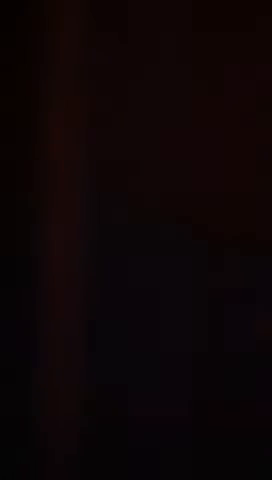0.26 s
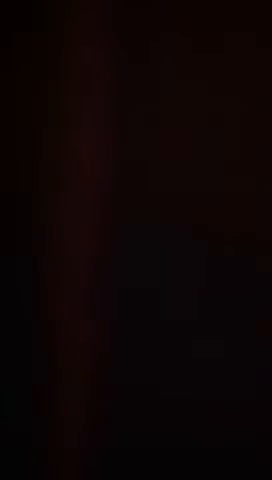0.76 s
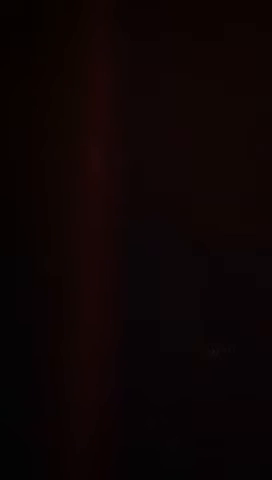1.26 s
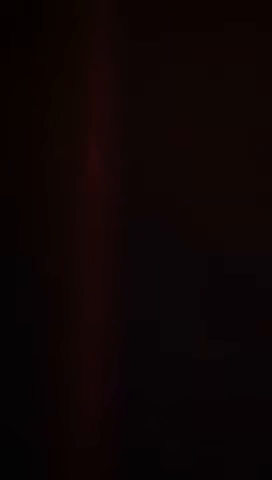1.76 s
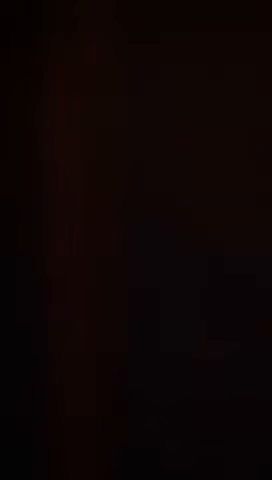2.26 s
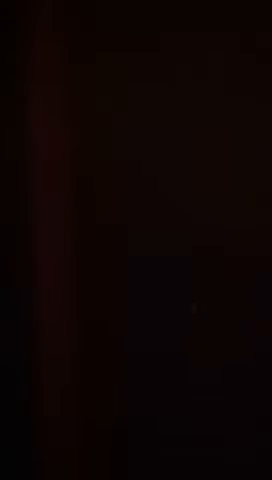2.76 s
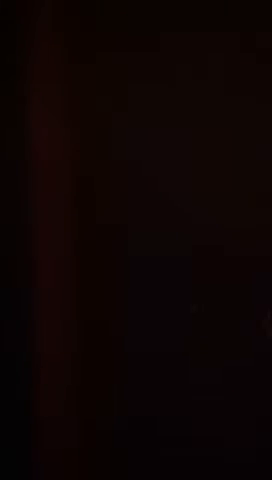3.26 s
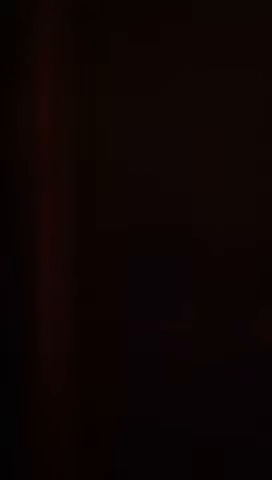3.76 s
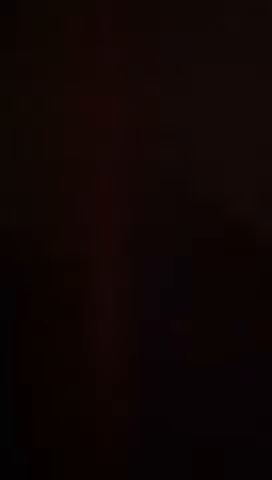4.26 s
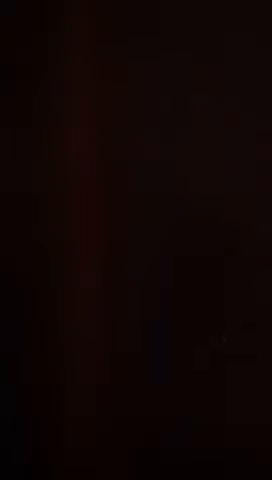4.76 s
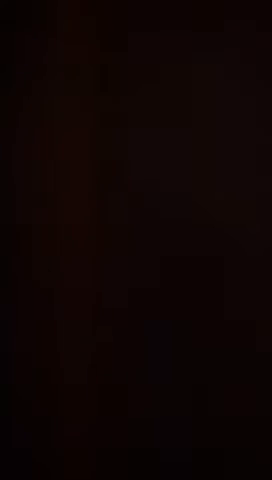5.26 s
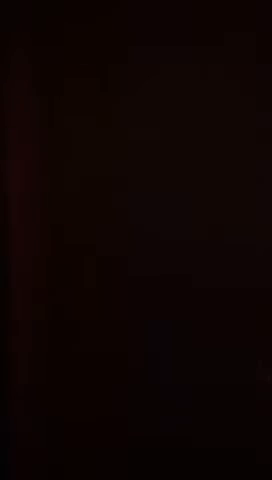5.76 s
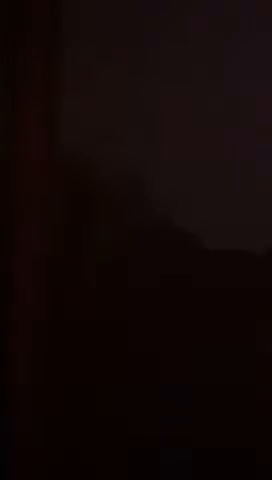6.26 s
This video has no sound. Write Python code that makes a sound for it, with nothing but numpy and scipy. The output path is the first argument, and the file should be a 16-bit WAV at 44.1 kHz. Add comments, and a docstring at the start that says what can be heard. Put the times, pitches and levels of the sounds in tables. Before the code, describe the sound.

Night rain drips and gurgles near a sheltered spot; after about four seconds a drop raps sharply and low thunder grumbles in uneven waves.

```python
"""Steady rain heard from a sheltered spot: short ticks, smacks and plops close by over a far wash.
Run-off gurgles in gushes, one drop raps a hard object, and distant thunder rolls in, in several waves.
Ticks and the rap excite damped resonances, smacks are filtered noise bursts, puddle drips gliding sines.
Run-off is many small ringing bubbles; thunder is random shock fronts coloured by frequency bands
under swelling gains, with single strong pulses and sharp snaps; the far rain is coloured noise."""
import sys
import numpy as np
from scipy import signal
from scipy.io import wavfile

SR = 44100
rng = np.random.default_rng(int(sys.argv[2]) if len(sys.argv) > 2 else 0)


def generate_wav(sig):
    """Save sig (samples, or channels by samples) to the path in sys.argv[1] as 16-bit PCM at SR."""
    pcm = np.round(np.clip(np.atleast_2d(sig).T, -1, 1) * 32767).astype(np.int16)
    wavfile.write(sys.argv[1], SR, pcm)


N = 287530   # length in samples

SPLATTER_T60_S = 0.014
TAP_DB = 15   # the first contact stands above the splatter


def tick(level_db, pitch_hz, splash_db, t60_s):
    """Resonance: a decaying burst of splatter drives a damped mode, beside a wide-band splash."""
    t = np.arange(4000) / SR
    splatter, spray = rng.standard_normal((2, 4000))
    blow = splatter * from_db(-60 * t / SPLATTER_T60_S) + from_db(TAP_DB) * (t == 0)
    body = ring(ring(blow, pitch_hz, t60_s), pitch_hz, t60_s)   # two in series: a soft, wet contact
    body = body / np.abs(body).max()
    splash = rms_one(bandpass(spray, 2500, 9500, order=3)) * from_db(splash_db - 60 * t / 0.027)
    return from_db(level_db) * (body + splash)


# short ticks: near drops on hard ground and leaves, and sharp snaps within the thunder's crackle:
# start_s [s], level_db [dB, peak of the body], pitch_hz [Hz], splash_db [dB, against the peak of the body]
TICKS = [(0.0396, -50, 1940, -18), (0.3097, -46.5, 3100, -23), (0.41, -48.5, 5600, -10),
         (0.612, -43.5, 2300, -8), (0.71, -42.5, 2480, -25), (0.7517, -47, 2160, -18),
         (0.7822, -45, 3660, -7), (0.8237, -48, 2290, -14), (0.856, -50.5, 7160, -16),
         (1.0131, -49, 2270, -12), (1.04, -46.5, 2850, -16), (1.0722, -45, 2570, -12),
         (1.1205, -50.5, 4330, -4), (1.134, -48.5, 1950, -14), (1.2815, -50, 2600, -21),
         (1.3382, -44.5, 2160, -22), (1.422, -50, 2950, -14), (1.4676, -51, 2020, -12),
         (1.513, -49, 2920, -20), (1.5682, -48, 2400, -14), (1.6242, -52, 2180, -14),
         (1.7464, -51, 2860, -20), (1.8432, -45.5, 6100, -15), (1.9465, -49.5, 2240, -8),
         (1.959, -52, 6100, -12), (2.114, -43.5, 4080, -20), (2.147, -53, 3600, -12),
         (2.5101, -45, 1870, -19), (2.543, -48, 2050, -14), (2.823, -48.5, 3770, -5),
         (2.864, -46.5, 2590, -9), (2.894, -53, 4220, 3), (3.0043, -44.5, 1820, -14),
         (3.049, -48.5, 2370, -4), (3.2774, -49, 2390, -16), (3.3318, -52, 2510, -16),
         (3.3593, -44.5, 2200, -22), (3.4004, -47, 2200, -21), (3.678, -48, 5300, -9),
         (3.7135, -48, 4670, -16), (3.7349, -49, 4000, -16), (3.764, -45, 3740, -6),
         (4.0195, -48, 2470, -7), (4.0634, -45.5, 3720, -6), (4.0856, -48, 4860, 0.5),
         (4.1175, -46.5, 2700, -18), (4.1325, -39.5, 1930, -19), (4.2896, -47, 2260, -19),
         (4.349, -40, 1510, -16), (4.391, -51.5, 6500, -18), (4.44, -50.5, 8240, -15),
         (4.535, -52, 6800, 0), (4.6144, -48, 2290, -22), (4.673, -47, 5380, -17), (4.738, -47, 2200, -20),
         (4.8037, -48, 1780, -6), (4.9472, -47, 2400, -10), (4.8703, -45, 5600, -18),
         (5.178, -43, 1880, -20), (5.4796, -49, 3320, -10), (5.6136, -50, 2930, -21),
         (5.7294, -50, 2900, -12), (5.937, -47, 2330, -22), (5.9848, -50, 1940, -13),
         (6.1858, -52, 4370, -14), (6.1948, -47, 3080, -17), (6.3255, -48, 1810, -20),
         (6.4018, -49, 2010, -9), (6.4657, -50, 2070, -11), (0.275, -51, 3100, -20),
         (0.594, -56, 10300, -20), (0.605, -52, 5000, -20), (0.615, -51, 3800, -20),
         (0.907, -55, 4480, -12), (1.141, -59, 11700, -20), (1.765, -52, 5700, -20), (1.8, -49, 3120, -20),
         (1.92, -52, 6200, -20), (1.939, -52, 8900, -20), (2.028, -49, 3960, -20), (2.114, -52, 5500, -20),
         (2.129, -55, 8960, -20), (2.243, -53, 4650, -20), (2.336, -49.5, 8600, -20),
         (2.484, -52, 7000, -20), (2.823, -49, 9200, -20), (2.857, -55, 8800, -20),
         (3.008, -45.5, 6330, -20), (3.043, -51, 2930, -20), (3.24, -51, 5800, -20),
         (3.332, -49, 4650, -20), (3.445, -52, 3100, -20), (3.764, -52, 8800, -20), (3.957, -51, 8640, -15),
         (4.305, -46, 2410, -20), (4.313, -48, 4300, -20), (4.559, -45.5, 3600, -20),
         (4.701, -52, 4820, -20), (4.884, -49, 3790, -20), (4.965, -51, 6720, -15), (4.99, -46.5, 4650, -5),
         (5.165, -53, 7920, -20), (5.17, -43.5, 4000, -20), (5.198, -54, 10300, -15),
         (5.317, -55, 6890, -20), (5.325, -50, 2760, -15), (5.447, -50, 7260, -17), (5.508, -52, 8650, -20),
         (5.713, -54.5, 7000, -20), (5.847, -58, 7200, -7), (5.911, -56, 8800, -20), (5.95, -57, 4650, -12),
         (5.987, -52.5, 4820, -6), (6.332, -49, 5130, -13), (6.465, -54, 8100, -20)]
TICK_T60_S = 0.0036


def ticks():
    """Impact excitation: each short tick, a near drop or a snap of the thunder, sounds its own pitch."""
    out = np.zeros(N)
    for start_s, level_db, pitch_hz, splash_db in TICKS:
        add(out, start_s, tick(level_db, pitch_hz, splash_db, TICK_T60_S))
    return out


# drops on one small hard surface: start_s [s], level_db [dB, peak of the body]
PINGS = [(0.0108, -46), (0.697, -44), (0.8619, -57), (0.9068, -51), (1.7656, -42), (1.8657, -43.5),
         (2.08, -46), (2.7834, -49), (3.4445, -53), (3.8072, -42.5), (4.6997, -48), (4.8698, -50),
         (5.1417, -46.5), (5.6972, -45), (5.7513, -49.5), (6.0786, -60), (6.1664, -54), (6.2387, -54),
         (6.3724, -48), (6.4368, -48), (6.4864, -53)]
PING_HZ, PING_SPLASH_DB, PING_T60_S = 3790, -17, 0.0045


def pings():
    """Natural frequency: one surface always rings at the same pitch, however hard it is struck."""
    out = np.zeros(N)
    for start_s, level_db in PINGS:
        add(out, start_s, tick(level_db, PING_HZ, PING_SPLASH_DB, PING_T60_S))
    return out


# broad impact bursts: drops that land flat, and short bright hisses of spray:
# start_s [s], level_db [dB, peak], low_hz [Hz], high_hz [Hz], t60_s [s]
SMACKS = [(0.5337, -43.5, 900, 2700, .047), (0.7875, -41, 1200, 4200, 0.077),
          (1.1205, -50, 8000, 14500, .02), (1.865, -49, 900, 3000, .03), (2.3653, -40, 900, 4200, 0.053),
          (2.465, -43, 1000, 4500, .047), (2.471, -46, 1400, 2000, .047), (2.894, -52, 8000, 14500, .02),
          (2.9607, -42, 1000, 4470, 0.028), (3.6972, -38.5, 1100, 4470, .047),
          (4.0858, -46, 6000, 14500, .025), (4.954, -42, 600, 2620, .047), (4.99, -54, 7000, 14500, .02),
          (5.697, -46, 1700, 3400, .03), (5.915, -51, 900, 2600, .06), (5.94, -46, 1700, 3600, .06)]


def smacks():
    """Broadband impact: a flat landing or a hiss of spray is a decaying noise burst limited to one band."""
    out, t = np.zeros(N), np.arange(4000) / SR
    for start_s, level_db, low_hz, high_hz, t60_s in SMACKS:
        burst = rng.standard_normal(4000) * from_db(-60 * t / t60_s) + from_db(TAP_DB) * (t == 0)
        smack = bandpass(burst, low_hz, high_hz, order=3)
        add(out, start_s, from_db(level_db) * smack / np.abs(smack).max())
    return out


# drips into a puddle: start_s [s], level_db [dB, main bubble before its decay], pitch_hz [Hz, at the start]
PLOPS = [(0.534, -37.5, 456), (0.5345, -46, 644), (0.627, -49, 988), (0.641, -44, 990), (0.649, -45, 990),
         (0.657, -46, 960), (0.669, -46, 970), (0.785, -42.5, 600), (1.466, -46, 753), (1.656, -47, 845),
         (1.818, -43.5, 594), (1.946, -47, 1104), (2.366, -42.5, 1086), (2.367, -44, 1480),
         (2.413, -48, 810), (2.467, -46, 1094), (2.48, -40, 1146), (2.496, -43, 830), (2.534, -44, 835),
         (2.672, -47, 720), (2.898, -48, 1070), (3.018, -43, 954), (3.034, -43.5, 600), (3.386, -46.5, 860),
         (0.146, -45.5, 1095), (0.403, -49, 900), (0.826, -49, 1000), (0.862, -50, 900), (1.51, -47, 550),
         (1.664, -50, 880), (1.73, -50, 1260), (1.743, -44, 960), (1.752, -49, 1000), (1.796, -52, 950),
         (1.808, -49, 900), (3.279, -50, 1380), (5.584, -49, 550), (5.916, -50, 1100)]
PLOP_RISE_S, PLOP_T60_S = 0.0013, 0.041


def plops():
    """Bubble resonance: trapped air oscillates as a damped sine whose pitch rises."""
    out, t = np.zeros(N), np.arange(4000) / SR
    for start_s, level_db, pitch_hz in PLOPS:
        phase = 2 * np.pi * pitch_hz * (t + 1.4 * t ** 2)
        bubbles = np.sin(phase) + 0.5 * np.sin(1.3 * phase)   # a smaller bubble splits off
        envelope = from_db(level_db - 60 * t / PLOP_T60_S) * np.minimum(t / PLOP_RISE_S, 1)
        add(out, start_s, envelope * bubbles)
    return out


# modes of the struck object, the hollow and the thud first:
# pitch_hz [Hz], level_db [dB, relative to the whole rap], t60_s [s]
RAPPED = [(364, -26, 0.083), (420, -22, 0.01), (1310, -18.5, 0.013), (1400, -1, 0.0059),
          (1650, -13.5, 0.0089), (2080, -17, .006), (3130, -21, 0.0053), (2620, -3, 0.0033),
          (4200, -9.5, 0.0053), (5070, -17, 0.013), (5810, -6.5, 0.0042), (6200, -16, 0.0073)]
RAP_S, RAP_DB = 4.1945, -11.5
RAP_SPRAY_DB = -22.5   # the drop bursts into spray, relative to the whole rap


def rap():
    """Modal superposition: a click and its scattered reflections set every mode of the object ringing."""
    t = np.arange(12000) / SR
    close = from_db(-35 - 60 * np.abs(t - 0.004) / 0.05) * (t > 0.002) * rng.standard_normal(12000)
    farther_walls = from_db(-53 - 60 * t / 0.15) * (t > 0.02) * rng.standard_normal(12000)
    blow = (t == 0) + close + farther_walls
    modes = [from_db(level_db) * ring(blow, pitch_hz, t60_s) for pitch_hz, level_db, t60_s in RAPPED]
    hollow, thud, *hard = modes
    body = highpass(hollow + thud, 220)
    crack = highpass(sum(hard), 700)   # the stiff upper modes radiate no bass
    crack = signal.sosfilt(signal.butter(5, 6900, fs=SR, output="sos"), crack)
    spray_envelope = from_db(RAP_SPRAY_DB - 60 * t / 0.037) * np.minimum(t / 0.0027, 1)
    spray = spray_envelope * bandpass(rng.standard_normal(12000), 6800, 9000)
    out = np.zeros(N)
    add(out, RAP_S, from_db(RAP_DB) * (body + crack + spray))
    return out


# gushes of run-off: start_s [s], rise_s [s], hold_s [s], gurgle_db [dB, rms at the top],
# spray_db [dB, against the gurgle]
GUSHES = [(0.586, .04, 0.056, -64, -9), (0.696, .02, .06, -69, -8), (0.78, 0.0089, 0.035, -62.5, -9),
          (0.84, .02, .02, -77, -14), (1.717, 0.016, 0.016, -75, -17), (2.377, 0.018, .02, -59, -13),
          (2.454, 0.01, 0.063, -57.5, -6), (2.563, 0.034, 0.11, -66.5, -13)]
GUSH_FALL_DB_PER_S = 138
TRICKLE_DB, SPRAY_DB = -62, -7   # steady run-off (rms); its spray against its gurgle


def runoff():
    """Bubble ensemble: running water rings in many bubbles, with finer, higher ones in its spray."""
    flow = from_db(TRICKLE_DB + 1.5 * drift(3.7))   # a wavering trickle
    mist = flow * from_db(SPRAY_DB)
    for start_s, rise_s, hold_s, gurgle_db, spray_db in GUSHES:
        gush = from_db(gurgle_db) * swell(start_s, rise_s, hold_s, GUSH_FALL_DB_PER_S)
        flow = flow + gush
        mist = mist + gush * from_db(spray_db)
    gurgle = grains(900, 1.26, low_hz=595, high_hz=1480, cycles=26)
    spray = grains(1500, 1.7, low_hz=1766, high_hz=4660, cycles=28)
    return flow * gurgle + mist * spray


# single strong fronts in the thunder: start_s [s], level_db [dB, before the decay], pitch_hz [Hz, of the pulse]
CLAPS = [(3.646, -32, 360), (3.654, -36, 360), (3.664, -31, 353), (3.682, -34, 370), (3.738, -41, 301),
         (3.748, -33, 330), (3.844, -39, 260), (3.854, -34, 400), (3.889, -39, 396), (3.9, -29, 447),
         (3.952, -34, 390), (3.967, -29, 328), (3.982, -26.5, 430), (4.007, -43, 220), (4.438, -29, 310),
         (4.48, -27, 300), (4.498, -34, 550), (4.505, -35, 250), (4.531, -39, 830), (4.585, -30, 288),
         (4.636, -37, 222), (4.677, -39, 250), (4.745, -34, 299), (4.77, -28, 355), (4.806, -38, 400),
         (4.953, -28.5, 200), (4.955, -30, 560), (4.984, -28, 237), (4.998, -25.5, 347), (5.005, -31, 480),
         (5.055, -39, 1310), (5.091, -29, 207), (5.126, -26, 550), (5.143, -31, 300), (5.163, -29, 498),
         (5.176, -30, 450), (5.187, -32, 690), (5.24, -40, 200), (6.029, -37, 277), (6.215, -41, 207),
         (6.251, -42, 310), (6.357, -32, 272), (6.37, -35, 280), (6.384, -31, 186), (6.445, -31, 198),
         (6.4582, -22, 327), (6.47, -27, 347)]


def claps():
    """Blast pulse: pressure rises, falls below rest and swings on briefly, its edge rounded by distance."""
    out, t = np.zeros(N), np.arange(2000) / SR
    for start_s, level_db, pitch_hz in CLAPS:
        envelope = from_db(level_db - 60 * t * pitch_hz / 7.8)   # 60 dB down in 7.8 cycles
        rounded = envelope * np.minimum(t / 0.0033, 1)
        add(out, start_s, rounded * np.sin(2 * np.pi * pitch_hz * t))
    return highpass(out, 110)


# spectra of the three thunder layers: frequency_hz [Hz], level_db [dB per Hz, relative]
DEEP = [(40, -51), (70, -15), (110, -3), (170, 6), (230, -1.5), (330, -69)]
RUMBLE = [(140, -48), (220, -5.5), (300, 1), (400, 2.5), (550, -6.5), (800, -25)]
CRACKLE = [(250, -61), (450, -6), (700, 8), (1200, 6), (1600, -0.5), (2200, -8), (4000, -24)]
# waves of thunder: start_s [s], rise_s [s], hold_s [s], rumble_db [dB, rms at the top before the echo],
# deep_db [dB, deep roll against rumble, before its lag], crackle_db [dB, against rumble]
WAVES = [(3.636, 0.012, 0.027, -54.5, -6, -5), (3.672, 0.012, 0.019, -57.5, -10, 6),
         (3.717, 0.029, 0.016, -52.5, -5, -2), (3.83, 0.014, 0.015, -48.5, -4, -13),
         (3.872, 0.017, 0.026, -49.5, -3, 0), (3.938, 0.016, 0.026, -45.5, -8, -2),
         (3.995, 0.013, 0.033, -55.5, -2, -10), (4.13, 0.064, 0.046, -49, -3.5, -6.5),
         (4.298, 0.04, 0.063, -52.5, -2.5, -6), (4.425, 0.026, 0.1, -47.5, -1, -3),
         (4.55, 0.05, 0.13, -53, -19, -4.5), (4.738, 0.028, 0.041, -46.5, -8, -6.5),
         (4.935, 0.032, 0.047, -46.5, -2, -3.5), (5.02, 0.019, 0.035, -47, -3, -1),
         (5.08, 0.025, 0.045, -44, -10, -3), (5.15, 0.017, 0.033, -44, -8, -4),
         (5.84, 0.051, 0.085, -60, 1, -3.5), (5.978, 0.036, 0.016, -55, -11, -7),
         (6.13, 0.11, 0.025, -54.5, -1.5, -2), (6.24, 0.03, 0.046, -54, -4, -7),
         (6.3, 0.03, 0.02, -52, -6, -5), (6.34, 0.024, 0.065, -44.5, -3, -4.5),
         (6.435, 0.02, 0.016, -42, -3, -19), (6.495, 0.018, .05, -45.5, -2, -3.5)]
WAVE_FALL_DB_PER_S = 231
DEEP_LAG_S = 0.061   # the deep roll builds up later and lasts longer
ECHO_S, ECHO_DB = 0.21, -7   # the land keeps rolling after each wave
BOOM_HZ, BOOM_T60_S, BOOM_DB = 345, 0.068, -13   # the shelter booms along; dB against the rumble
LUMP_DB, LUMPS_PER_S = 1.4, 39   # the rumble and crackle come in lumps: spread, corner rate
FAR_RUMBLE_DB, FAR_DEEP_DB, FAR_CRACKLE_DB = -64, -66, -72   # steady murmur of the storm, rms


def thunder():
    """Random superposition: shock fronts from each kink of the channel; far parts deep, nearer ones crackle."""
    rumble_power, deep_power, crackle_power = 0, 0, 0
    for start_s, rise_s, hold_s, rumble_db, deep_db, crackle_db in WAVES:
        power = (from_db(rumble_db) * swell(start_s, rise_s, hold_s, WAVE_FALL_DB_PER_S)) ** 2
        rumble_power = rumble_power + power
        deep_power = deep_power + power * from_db(2 * deep_db)   # power takes twice the dB
        crackle_power = crackle_power + power * from_db(2 * crackle_db)
    deep_power = linger(deep_power, DEEP_LAG_S)

    fronts = clicks(1200, 2.3, channels=5)
    deep = coloured(fronts, DEEP, patchy_db=1)
    rumble = coloured(fronts, RUMBLE, patchy_db=1)
    crackle = coloured(fronts, CRACKLE, patchy_db=1)
    rumble = rumble + from_db(BOOM_DB) * rms_one(ring(rumble, BOOM_HZ, BOOM_T60_S))
    lumps = from_db(LUMP_DB * drift(LUMPS_PER_S))

    layers = (
        (rms_one(rumble * lumps), rumble_power, FAR_RUMBLE_DB),
        (deep, deep_power, FAR_DEEP_DB),
        (rms_one(crackle * lumps), crackle_power, FAR_CRACKLE_DB),
    )
    roll = np.zeros(N)
    for sound, power, far_db in layers:
        echoed = power + from_db(2 * ECHO_DB) * linger(power, ECHO_S)
        roll += sound * np.sqrt(echoed + from_db(2 * far_db))
    return highpass(roll, 60)


def patter():
    """Shot noise: drops a few metres away strike at random, as short rings and broad splashes."""
    rings = from_db(-66.5) * grains(900, 3.4, low_hz=1700, high_hz=8630, cycles=24)
    hits = np.abs(clicks(110, 3)[0])
    envelope = signal.lfilter([1], [1, -from_db(-60 / (0.03 * SR))], hits)   # t60 0.03 s
    splashes = bandpass(envelope * rng.standard_normal(N), 1800, 7000)
    return rings + from_db(-69) * rms_one(splashes)


# spectrum of the far rain: frequency_hz [Hz], level_db [dB per Hz, relative]
RAIN = [(18, -48), (30, -37), (49, -25), (147, 5), (355, -10.5), (567, -10.5), (881, -8.5), (953, -4.5),
        (1300, -1), (1650, -16), (1830, -9), (3780, -13), (9640, -17), (12800, -27.5), (15000, -55)]
RAIN_DB = -58   # rms


def wash():
    """Incoherent summation: countless far drops merge into a coloured, flickering hiss."""
    return from_db(RAIN_DB) * coloured(rng.standard_normal((2, N)), RAIN, patchy_db=1.87)


def from_db(db):
    """Logarithmic level: decibels to amplitude gain."""
    return 10 ** (np.asarray(db) / 20)


def rms_one(x):
    """Normalisation: scale to unit rms."""
    return x / np.sqrt(np.mean(x ** 2) + 1e-20)


def bandpass(x, low_hz, high_hz, order=2):
    """Band limiting: a Butterworth filter keeps low_hz to high_hz."""
    return signal.sosfilt(signal.butter(order, [low_hz, high_hz], "band", fs=SR, output="sos"), x)


def highpass(x, corner_hz):
    """Bass roll-off: a second-order Butterworth filter."""
    return signal.sosfilt(signal.butter(2, corner_hz, "high", fs=SR, output="sos"), x)


def add(out, start_s, sound):
    """Linear superposition: mix a short sound in at its start."""
    i = round(start_s * SR)
    out[i:i + len(sound)] += sound[:N - i]


def ring(drive, pitch_hz, t60_s):
    """Damped oscillator: a unit click sets a decaying sine of height 1 ringing."""
    r, w = from_db(-60 / (t60_s * SR)), 2 * np.pi * pitch_hz / SR
    return signal.lfilter([0, np.sin(w)], [1, -2 * r * np.cos(w), r * r], drive + 1e-18)


def clicks(per_s, spread_db, channels=1):
    """Poisson-like arrivals: random clicks of random sign, many small and a few large."""
    shape = (channels, N)
    sizes = from_db(spread_db * np.minimum(rng.exponential(1, shape), 5))
    signs = rng.choice([-1, 1], shape)
    return sizes * signs * (rng.random(shape) < per_s / SR)


def grains(per_s, spread_db, low_hz, high_hz, cycles):
    """Resonator bank: clicks dealt to 20 pitches, each falling 60 dB in the given cycles; rms 1."""
    train, dealt = clicks(per_s, spread_db)[0], rng.integers(0, 20, N)
    out = np.zeros(N)
    for k, pitch_hz in enumerate(np.geomspace(low_hz, high_hz, 20)):
        out += ring(train * (dealt == k), pitch_hz, cycles / pitch_hz)
    return rms_one(out)


def drift(rate_hz):
    """Slow random modulation: noise through a double one-pole low-pass, of unit rms."""
    step = 40   # samples between the computed values
    r = np.exp(-2 * np.pi * rate_hz * step / SR)
    noise = rng.standard_normal(N // step + 2002)
    slow = signal.lfilter([1], [1, -2 * r, r * r], noise)[2000:]   # skip the filter's settling
    return np.interp(np.arange(N) / step, np.arange(len(slow)), rms_one(slow))


def coloured(sources, spectrum, patchy_db):
    """Spectral shaping: third-octave bands from sources in turn, each with its level and flicker; rms 1."""
    hz, db = np.transpose(spectrum)
    out, edges = np.zeros(N), 25 * 2 ** np.arange(0, 9.4, 1 / 3)
    for k, (low, high) in enumerate(zip(edges, edges[1:])):
        centre = np.sqrt(low * high)
        if hz[0] < centre < hz[-1]:
            band = bandpass(sources[k % len(sources)], low, high)
            level_db = np.interp(np.log(centre), np.log(hz), db)
            out += band * from_db(level_db + patchy_db * drift(18))
    return rms_one(out)


RISE_DB = 10.5   # a swell starts this far under its top


def swell(start_s, rise_s, hold_s, fall_db_per_s):
    """Exponential envelope: climbs evenly in dB, holds at 1 and falls evenly in dB."""
    t = np.arange(N) / SR - start_s
    climb_db = np.minimum(RISE_DB * (t / rise_s - 1), 0)
    fall_db = fall_db_per_s * np.maximum(t - rise_s - hold_s, 0)
    return (t > 0) * from_db(climb_db - fall_db)


def linger(power, seconds):
    """Energy storage: power smeared later in time by a one-pole lag."""
    r = np.exp(-1 / (seconds * SR))
    return signal.lfilter([1 - r], [1, -r], power)


def scene():
    """Superposition: all sources summed on one channel."""
    impacts = ticks() + pings() + smacks() + plops()
    storm = claps() + thunder()
    return (impacts + rap() + runoff() + storm + patter() + wash())[None]


MIC_LOW_HZ, CUTOFF_HZ = 70, 15500


def record(dry):
    """Band limitation: the small microphone loses the deep bass, and the top is cut steeply."""
    thin = highpass(dry, MIC_LOW_HZ)
    return signal.sosfilt(signal.cheby2(12, 70, CUTOFF_HZ, fs=SR, output="sos"), thin)


dry = scene()
out = record(dry)
generate_wav(out)
```